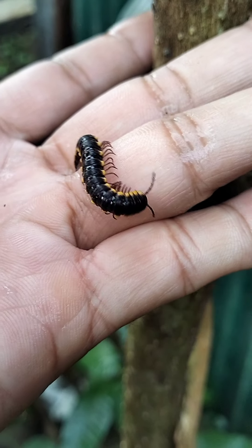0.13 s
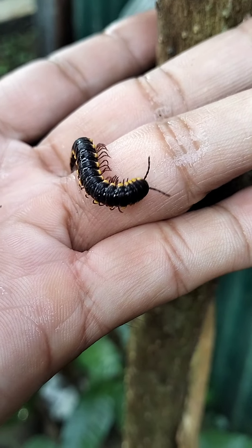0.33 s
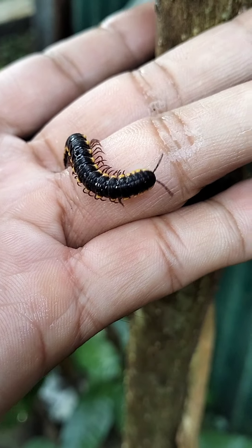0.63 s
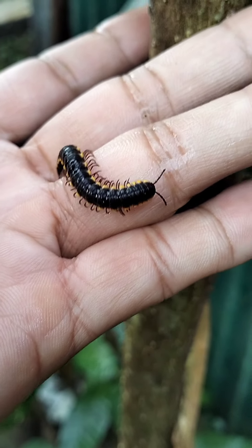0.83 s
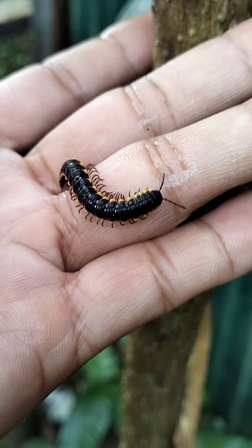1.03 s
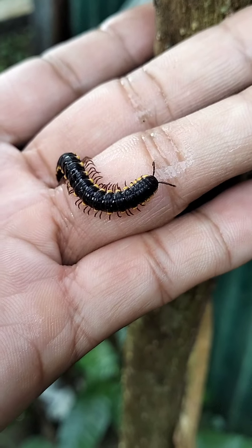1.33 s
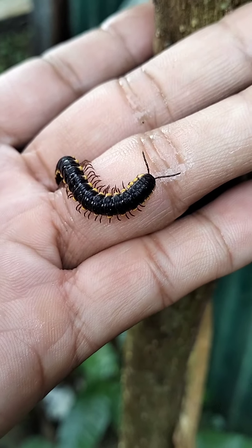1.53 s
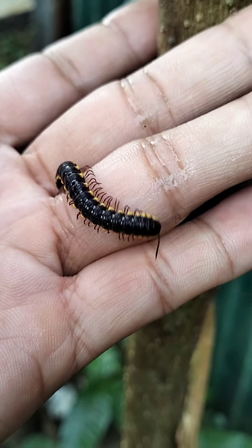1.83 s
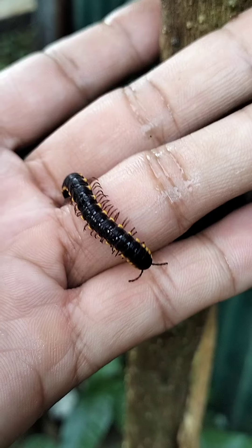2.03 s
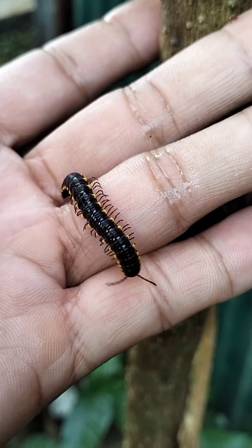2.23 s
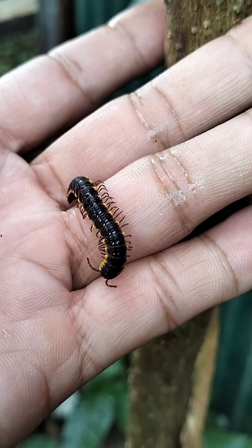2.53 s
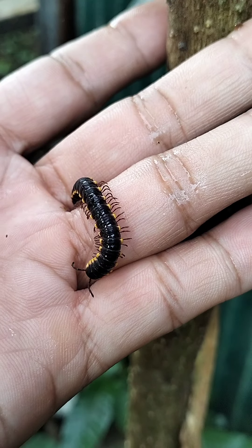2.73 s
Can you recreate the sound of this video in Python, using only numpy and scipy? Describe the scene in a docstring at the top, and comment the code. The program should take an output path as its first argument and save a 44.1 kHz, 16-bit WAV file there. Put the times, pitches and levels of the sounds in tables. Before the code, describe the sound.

A distant animal, probably a dog, gives one hoarse, echoing call midway through. Around it, crickets trill in high bouts and small birds chip and whistle in a wooded garden, over far insects and a low rumble.

```python
"""A wooded garden by day

A distant animal, probably a dog, gives one hoarse, echoing call: rough pulses ring in throat and mouth.
A cricket trills in two bouts, one short tone per wing stroke, and a farther one joins in. Small birds
chip and whistle in sliding notes, scattered by the trees. Two soft hoots sound far off and two faint
ticks close by, over a steady chorus of far insects, a low outdoor rumble, a drone and a very high hiss."""
import sys
import numpy as np
from scipy import signal
from scipy.fft import rfft, irfft
from scipy.io import wavfile

SR = 44100
rng = np.random.default_rng(int(sys.argv[2]) if len(sys.argv) > 2 else 0)


def output_pcm(signal):
    """Save a mono or channel-first signal as 16-bit PCM at the path in sys.argv[1].

    Samples are clipped to [-1, 1] before scaling.
    """
    pcm = np.clip(np.atleast_2d(signal).T, -1, 1) * 32767
    wavfile.write(sys.argv[1], SR, np.round(pcm).astype(np.int16))


N = 126567
TIME = np.arange(N) / SR

# how the hoarse call moves: t/s, level/dB, pitch f/Hz, mouth resonance f/Hz, upper resonance f/Hz
CALL_SHAPE = [(1.212, -73, 360, 1090, 2000), (1.251, -52, 355.9, 1074, 2030),
              (1.29, -40.5, 361.6, 1160, 1910), (1.344, -47, 359.5, 1070, 1720),
              (1.40, -42.5, 352.3, 954, 1620), (1.459, -41.5, 340.2, 976, 1610),
              (1.511, -48.5, 331.1, 963, 1520), (1.58, -45, 310.8, 910, 1467),
              (1.658, -54, 284.7, 825, 1490)]
# when the near and the far cricket trill: start t/s, end t/s, level/dB
NEAR_BOUTS = [(-.3, .98, -62.5), (1.4585, 2.58, -63)]
FAR_BOUTS = [(.9, 1.5, -80), (2.55, 2.9, -76.5)]
# birds' falling chips and soft whistles: start t/s, length t/s, from f/Hz, to f/Hz, level/dB
CHIPS = [(0.042, .04, 5460, 3900, -62.5), (0.06, 0.024, 4404, 3804, -54.5), (0.605, 0.041, 4870, 3704, -61),
         (1.134, 0.045, 5346, 3760, -56), (1.171, 0.049, 5804, 3900, -58.5),
         (1.218, 0.029, 4480, 3770, -52.5), (1.713, 0.039, 5430, 3800, -62),
         (1.75, 0.037, 4422, 3764, -59.5), (2.01, 0.032, 5300, 4180, -71),
         (2.021, 0.025, 4230, 3856, -51.5), (2.385, 0.041, 4595, 3580, -60),
         (2.638, 0.051, 5630, 3800, -60.5), (2.688, 0.039, 4400, 3710, -60)]
WHISTLES = [(0.112, 0.03, 3320, 2880, -72), (0.141, 0.12, 2790, 2446, -72.5),
            (0.217, 0.036, 3360, 3020, -70), (0.288, 0.037, 2220, 1935, -69),
            (0.34, 0.13, 1984, 2963, -71.5), (0.46, 0.031, 2756, 2154, -67.5),
            (0.518, 0.03, 4280, 4130, -67.5), (0.55, .08, 1766, 2246, -76.5),
            (0.932, 0.048, 4030, 3700, -72.5), (1.008, 0.022, 4325, 4020, -65),
            (1.076, 0.075, 3060, 3094, -79), (1.503, 0.064, 4350, 4090, -73.5),
            (2.653, .035, 5800, 5600, -74), (2.512, 0.035, 3145, 3230, -66),
            (2.596, 0.24, 3260, 3140, -78.5), (2.775, 0.061, 3100, 2873, -60.5),
            (2.822, 0.055, 2940, 2030, -66.5)]
# a second bird's phrases of three quick high notes: start t/s, last note's level/dB
PHRASES = [(0.107, -60), (.357, -61.5), (0.634, -61), (0.874, -61)]
# thin, very high peeps: start t/s, level/dB
PEEPS = [(.715, -76), (1.041, -70), (1.407, -71.5), (2.796, -71)]
# very distant hoots: start t/s, length t/s, f/Hz, level/dB
HOOTS = [(0.524, 0.063, 700.6, -66), (0.668, 0.058, 693, -69.5)]
# small ticks: start t/s, body level/dB, body resonance f/Hz, crackle level/dB, decay t/s
TICKS = [(2.364, -69, 2300, -68, .003), (2.443, -54, 610, -61, .009)]
# tone colour of the rumble, the far insects and the hiss: f/Hz, relative level/dB
RUMBLE_SPECTRUM = [(20, -11), (40, -9.5), (68, 3), (110, -1.5), (152, -5.5), (200, -14.5), (310, -18),
                   (480, -23.5), (700, -22.5), (900, -30), (1450, -33), (2100, -50), (3200, -41.5),
                   (6000, -55), (9500, -54.5), (16000, -38.5)]
INSECT_SPECTRUM = [(2600, -36), (3500, -15), (4200, 6.5), (4700, -8), (5400, -21.5), (7300, -20.5),
                   (8300, -4.5), (9000, -37), (10500, -27.5), (15600, -5)]
HISS_SPECTRUM = [(9500, -17), (10500, -12), (11400, -7), (11700, -11), (12400, -4), (13400, -.5),
                 (14100, -2), (15000, 0), (15700, -1)]
# how the drone and the hiss rise and fall: t/s, level/dB
DRONE_LEVELS = [(0, -59.5), (.45, -55), (.85, -56.5), (1.2, -63.5), (1.6, -60), (2.1, -68.5), (2.87, -67)]
HISS_LEVELS = [(0, -74), (.4, -69), (.9, -72), (1.3, -72.5), (1.6, -67), (1.9, -72.5), (2.25, -73),
               (2.6, -69.5), (2.87, -74)]


def hoarse_call():
    """A clear yelp breaks into rough pulses through a closing mouth, and echoes far off."""
    jitter, rasp, flutter_db, fade_db_per_s = .07, .8, 2.5, 496
    yelp_at_s, yelp_hz, echo_delay_s, tail_s = 1.249, 687.4, .52, 1.56
    times, *columns = np.transpose(CALL_SHAPE)
    db, pitch, mouth_hz, upper_hz = [np.interp(TIME, times, column) for column in columns]
    outside_call_s = np.abs(TIME - np.clip(TIME, times[0], times[-1]))
    db = db + flutter_db * drift(62) - fade_db_per_s * outside_call_s
    # each uneven cycle of the voice gives one pulse and one puff of noise
    cycles = np.cumsum(pitch * (1 + jitter * drift(120))) / SR
    pulses = rms_one(np.diff(np.floor(cycles), prepend=0))
    puffs = rms_one(rng.standard_normal(N) * (1 - cycles % 1) ** 2)
    source = pulses + rasp * puffs
    voice = (steep_resonance(source, hz=680, width_hz=440)
             + from_db(-4.5) * steep_resonance(source, mouth_hz, width_hz=330)
             + from_db(-15) * steep_resonance(source, upper_hz, width_hz=330))
    call = rms_one(band(voice, 440, 1900, order=5)) * from_db(db)
    add(call, echo_delay_s, from_db(-18.5) * band(call, 496, 1224))
    yelp = np.zeros(N)
    add(yelp, yelp_at_s, from_db(-41) * glide(.045, yelp_hz, yelp_hz))
    call = trees(call, echo_db=-4, tail_s=.22)
    return trees(call, echo_db=-7.5, tail_s=tail_s) + trees(yelp, echo_db=-6.5, tail_s=tail_s)


def cricket(bouts):
    """Each wing stroke is a short swelling tone that slides up to the wing's resonance."""
    wing_hz, sag_hz, settle_s = 6750, 444, .0074
    stroke_s, strokes_per_s, jitter_s, spread_db = .02, 45.2, .00027, 1.5
    out, t = np.zeros(N), TIME[:int(stroke_s * SR)]
    cycles = np.cumsum(wing_hz - sag_hz * np.exp(-(t / settle_s) ** 2)) / SR
    swell = np.sin(np.pi * (t / stroke_s) ** 1.68)   # peaks late in the stroke
    for start, end, db in bouts:
        stroke_times = np.arange(start, end - stroke_s / 2, 1 / strokes_per_s)
        for at, (detune, phase, late, loud) in zip(stroke_times, rng.standard_normal((100, 4))):
            stroke = 2 * swell * np.sin(2 * np.pi * (cycles * (1 + .001 * detune) + phase))
            add(out, at + jitter_s * late, from_db(db + spread_db * loud) * stroke)
    return out


def crickets():
    """A near cricket, and a far one blurred by the trees."""
    near = trees(cricket(NEAR_BOUTS), echo_db=-.5, tail_s=.2)
    far = trees(cricket(FAR_BOUTS), echo_db=7, tail_s=.25)
    return near + far


def birds():
    """Chips, high phrases, whistles and peeps: sliding notes, each scattered by the trees."""
    note_spacing_s, note_rise_db, waver_db = .032, 1.5, 2.5
    chips, notes, whistles, peeps = np.zeros((4, N))
    for start, length, from_hz, to_hz, db in CHIPS:
        rasp_hz = 120 + .09 * (from_hz - to_hz)   # a longer fall is raspier
        chip = glide(length, from_hz, to_hz, peak_at=.94, rasp_hz=rasp_hz, softness=.89)
        add(chips, start, from_db(db) * chip)
    for start, db in PHRASES:
        for k in range(3):
            note = glide(.024, from_hz=5517, to_hz=4540, rasp_hz=230)
            add(notes, start + k * note_spacing_s, from_db(db + note_rise_db * (k - 2)) * note)
    for start, length, from_hz, to_hz, db in WHISTLES:
        add(whistles, start, from_db(db) * glide(length, from_hz, to_hz, rasp_hz=65, softness=.51))
    for start, db in PEEPS:
        add(peeps, start, from_db(db) * glide(.026, from_hz=8275, to_hz=6450, rasp_hz=900, softness=.37))
    return (trees(chips, echo_db=4.5, tail_s=.4)
            + trees(notes, echo_db=4.5, tail_s=.26)
            + trees(whistles * from_db(waver_db * drift(23)), echo_db=1, tail_s=.4)
            + trees(peeps, echo_db=-1, tail_s=.33))


def hoots():
    """Soft, far-off pure notes that hold their pitch."""
    out = np.zeros(N)
    for start, length, hz, db in HOOTS:
        add(out, start, from_db(db) * glide(length, hz, hz))
    return trees(out, echo_db=-1, tail_s=.35)


def ticks():
    """Brief crackles with a small ringing body, dying away fast."""
    out = np.zeros(N)
    for start, body_db, hz, crackle_db, decay_s in TICKS:
        grit = rng.standard_normal(N)
        crackle = rms_one(band(grit, 500, 4200)) + from_db(-7) * rms_one(band(grit, 8500, 10500))
        body = rms_one(resonance(grit, hz, width_hz=180))
        tick = from_db(body_db) * body + from_db(crackle_db) * crackle
        add(out, start, tick * np.exp(-TIME / decay_s))
    return out


def background():
    """Shaped noise: a drone like a far motor, outdoor rumble, far insects and a very high hiss."""
    drone = steep_resonance(rng.standard_normal(N), hz=148.7, width_hz=35.4, order=2)
    drone *= from_db(np.interp(TIME, *np.transpose(DRONE_LEVELS)))
    rumble = from_db(-53) * noise(RUMBLE_SPECTRUM)
    insects = from_db(-72 + .6 * drift(10)) * noise(INSECT_SPECTRUM)
    hiss = from_db(np.interp(TIME, *np.transpose(HISS_LEVELS))) * noise(HISS_SPECTRUM)
    return drone + rumble + insects + hiss


def trees(x, echo_db, tail_s):
    """Trunks and leaves add dense echoes that fall 60 dB in tail_s; the power stays about the same."""
    t = TIME[:SR * 3 // 2]
    build_up = 1 - np.exp(-t / .0037)
    echoes = rng.standard_normal(len(t)) * from_db(-60 * t / tail_s) * build_up
    scattered = signal.fftconvolve(x, echoes / np.linalg.norm(echoes))[:N]
    return (x + from_db(echo_db) * scattered) / np.sqrt(1 + from_db(echo_db) ** 2)


def glide(length_s, from_hz, to_hz, peak_at=.59, rasp_hz=0, softness=.88):
    """One sliding note that swells and fades; fast pitch flutter makes it raspy."""
    flutters_per_s = 900
    progress = np.linspace(0, 1, int(length_s * SR))
    flutter = np.interp(progress * length_s * flutters_per_s, np.arange(256), rng.standard_normal(256))
    swell = np.abs(np.sin(np.pi * np.interp(progress, [0, peak_at, 1], [0, .5, 1]))) ** softness
    hz = from_hz + (to_hz - from_hz) * progress + rasp_hz * flutter
    return rms_one(swell * np.sin(2 * np.pi * (np.cumsum(hz) / SR + rng.random())))


def resonance(x, hz, width_hz, block=128):
    """Make a sound ring around one frequency, which may move."""
    out, state = np.zeros(N), np.zeros(2)
    hz = np.broadcast_to(hz, N)
    decay = np.exp(-np.pi * width_hz / SR)
    feed = np.array([1, 0, -1]) * (1 - decay ** 2) / 2
    for i in range(0, N, block):
        feedback = [1, -2 * decay * np.cos(2 * np.pi * hz[i] / SR), decay ** 2]
        out[i:i + block], state = signal.lfilter(feed, feedback, x[i:i + block], zi=state)
    return out


def steep_resonance(x, hz, width_hz, order=3):
    """The same resonance several times over, scaled to strength one."""
    for _ in range(order):
        x = resonance(x, hz, width_hz)
    return rms_one(x)


def band(x, low_hz, high_hz, order=2):
    """Keep what lies between two frequencies."""
    return signal.sosfilt(signal.butter(order, [low_hz, high_hz], "band", fs=SR, output="sos"), x)


def noise(spectrum):
    """Noise of a given tone colour, at strength one."""
    hz, db = np.transpose(spectrum)
    f = np.fft.rfftfreq(N, 1 / SR) + 1
    gain = from_db(np.interp(np.log(f), np.log(hz), db))
    return rms_one(irfft(rfft(rng.standard_normal(N)) * gain, N))


def drift(rate_hz):
    """A random wander of strength one, mostly slower than rate_hz."""
    f = np.fft.rfftfreq(N, 1 / SR)
    gain = (f > 0) / (1 + (f / rate_hz) ** 2)
    return rms_one(irfft(rfft(rng.standard_normal(N)) * gain, N))


def from_db(db):
    """Turn decibels into a factor to multiply by."""
    return 10 ** (np.asarray(db) / 20)


def rms_one(x):
    """Scale to an average strength (root mean square) of one."""
    return x / np.sqrt(np.mean(x ** 2) + 1e-20)


def add(out, start_s, x):
    """Mix a sound in at a given time."""
    i = int(start_s * SR)
    first, end = max(i, 0), min(i + len(x), N)
    if end > first:
        out[first:end] += x[first - i:end - i]


def scene():
    """The whole garden in one channel."""
    return (crickets() + birds() + hoots() + hoarse_call() + ticks() + background())[None]


def record(dry):
    """Cut the very highest treble steeply."""
    cutoff_hz = 15750
    return signal.sosfilt(signal.ellip(14, .1, 80, cutoff_hz, fs=SR, output="sos"), dry)


dry = scene()
out = record(dry)
output_pcm(out)
```